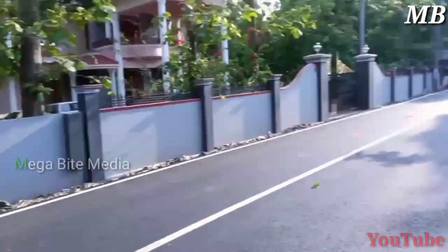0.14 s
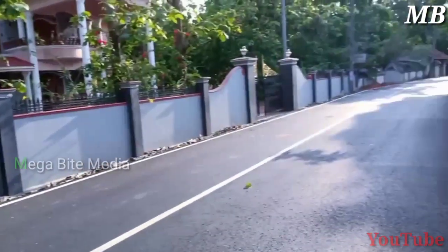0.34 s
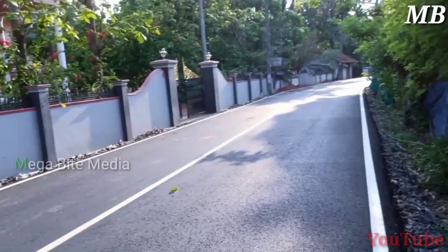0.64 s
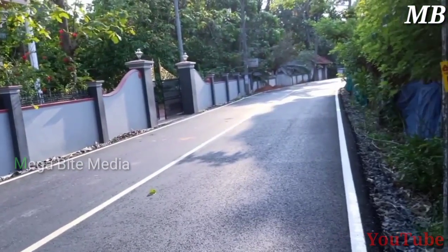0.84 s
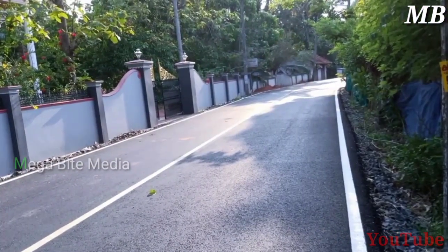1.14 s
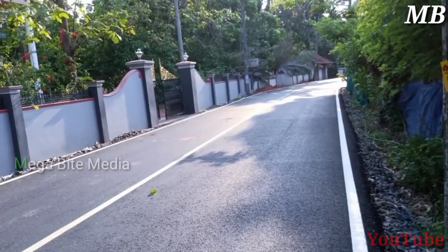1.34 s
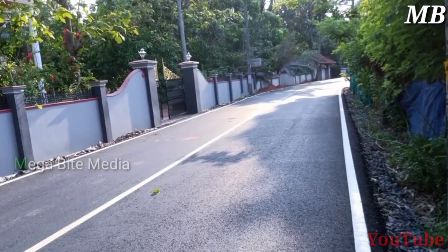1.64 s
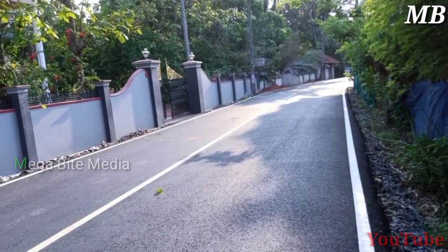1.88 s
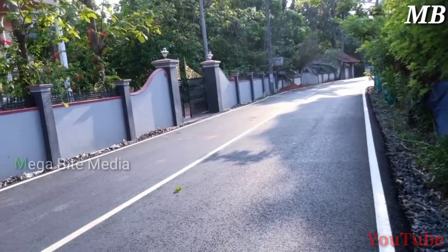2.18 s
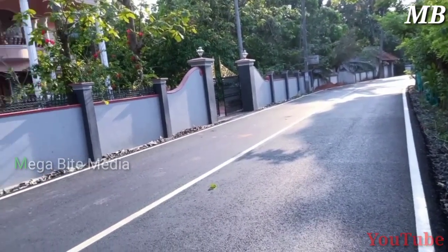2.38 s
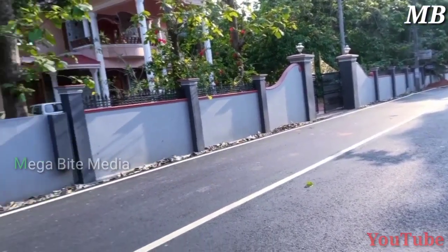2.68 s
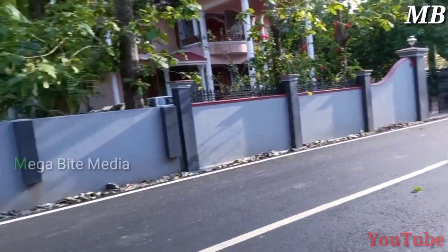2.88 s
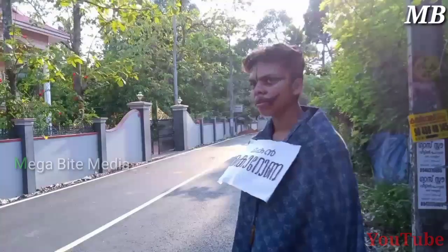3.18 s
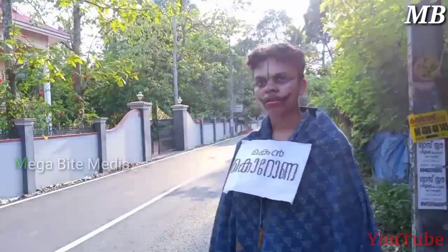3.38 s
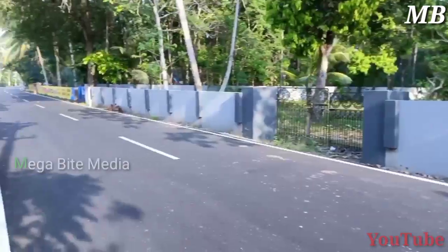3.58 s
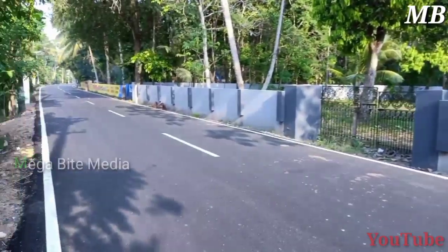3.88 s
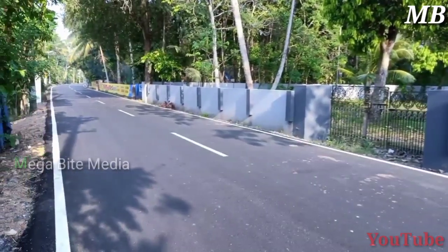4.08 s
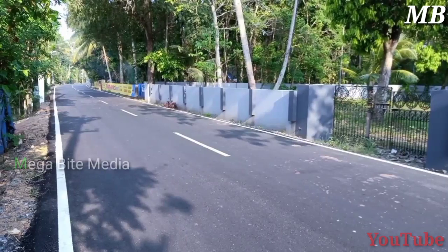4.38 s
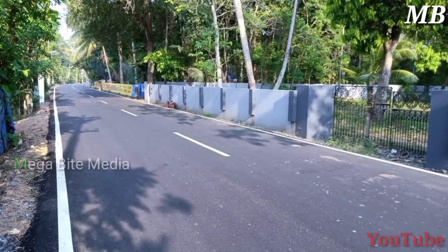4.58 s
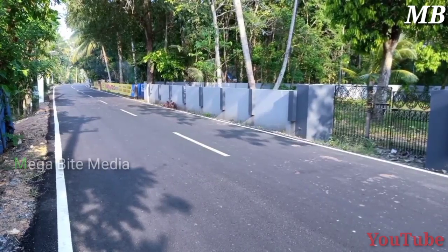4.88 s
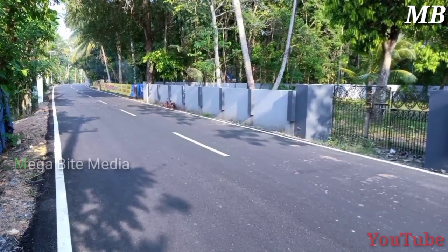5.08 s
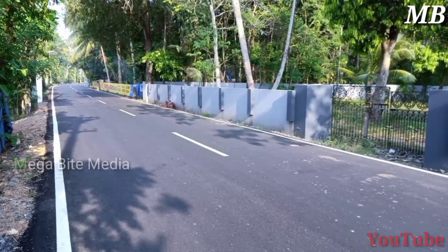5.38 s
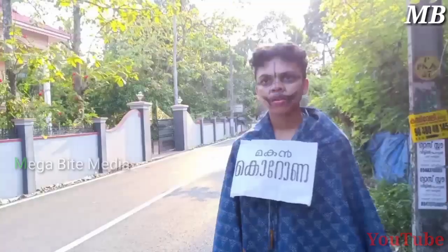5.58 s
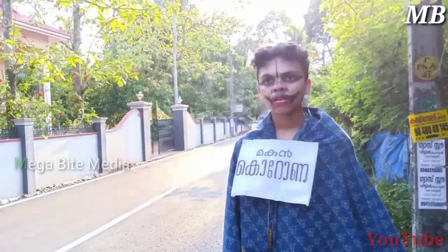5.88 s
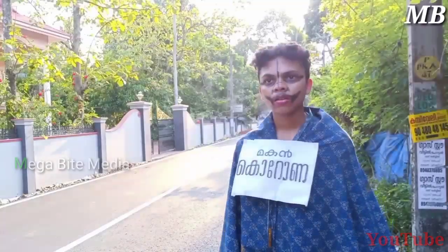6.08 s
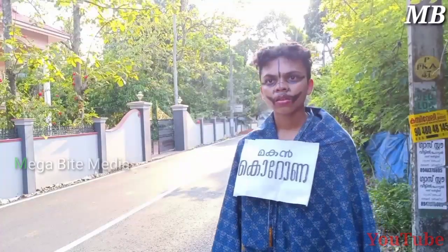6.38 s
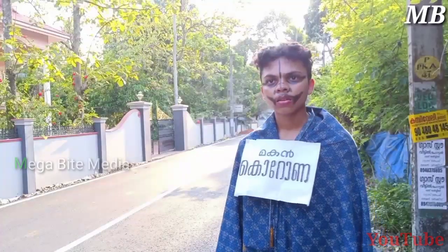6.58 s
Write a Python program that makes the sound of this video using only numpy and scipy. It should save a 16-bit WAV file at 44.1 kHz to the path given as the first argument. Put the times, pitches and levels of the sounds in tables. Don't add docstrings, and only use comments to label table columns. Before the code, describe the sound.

One cricket close to the microphones gives short, clear, pulsed chirps of five or eight rapid strokes, a little over two per second. Others of its kind answer softly almost in time, while a slightly lower group swells further off on the right. Underneath lie quiet outdoor air, a faint distant motor hum that grows, and low wind rumble, strongest at the start on the right. The insects fade at the end.

```python
import sys
import numpy as np
from scipy import signal
from scipy.fft import rfft, irfft, next_fast_len
from scipy.io import wavfile
from scipy.ndimage import uniform_filter1d

SR = 44100
rng = np.random.default_rng(int(sys.argv[2]) if len(sys.argv) > 2 else 0)


def store_pcm(level_fs):
    pcm = np.round(np.clip(level_fs, -1, 1) * 32767).astype(np.int16)
    wavfile.write(sys.argv[1], SR, np.atleast_2d(pcm).T)


def to_linear_factor(level_db):
    exponent = np.asarray(level_db, float) / 20
    return 10 ** exponent


N = 297087
TIME = np.arange(N) / SR


def near_cricket():
    # (multiple [1], level over the overtone level [dB], left minus right [dB])
    overtones = [
        (2, -2.5, -3.5),
        (3, -10, -9.5),
        (4, -22.5, 1.5),
    ]
    wing_hz, glide_hz, stroke_s = 2362, 165, .0215
    lag_s = 1.71e-4
    side = np.array([[.5], [-.5]])
    half = SR // 50
    t = np.arange(-half, half) / SR
    out, effort = np.zeros((2, N)), np.zeros(N)
    strokes = wing_strokes()
    chance = rng.standard_normal((len(strokes), 3))
    slip = np.tile(.3 * walk(700), 2)
    for (s, db, pan_db, over_db), (turn, pitch, span) in zip(strokes, chance):
        start = int(s * SR) - half
        length = stroke_s * (1 + 0.16 * span)
        swell, phase = stroke(t - lag_s * side, length, wing_hz + 18 * pitch, glide_hz)
        phase = phase + 9 * turn + slip[start:start + len(t)]
        x = to_linear_factor(db - 0.58 + pan_db * side) * swell * np.sin(phase)
        for k, rel_db, lean_db in overtones:
            level = to_linear_factor(over_db + rel_db + lean_db * side)
            x = x + level * swell ** (.45 * k) * np.sin(k * phase)
        add(out, start, x)
        add(effort, start, to_linear_factor(over_db) * swell[0] ** .4)
    flutter_db = 3 * np.tanh([walk(220), walk(220)])
    out *= to_linear_factor(flutter_db)
    noise = rng.standard_normal((3, 2, N))
    scrape = to_linear_factor(-14.5) * unit(band(noise[0], 4720, 2200, order=4))
    scrape += to_linear_factor(-16.5) * unit(band(noise[1], 7800, 9800))
    scrape += to_linear_factor(np.array([[-22], [-32]])) * unit(band(noise[2], 6800, 120))
    out += scrape * uniform_filter1d(effort, size=900)
    return out + to_linear_factor(-11.5) * foliage(out, t60=.17)


def wing_strokes():
    # (first stroke [s], peak [dB], swell [dB per stroke], left minus right [dB], overtones [dB])
    chirps = [(.173, -10.5, 1.5, -2, -38), (.577, -10.5, 0.5, -1, -38), (1.069, -11, -1, -2, -38),
              (1.465, -10.5, 0.5, -1, -37.5), (1.857, -11, 0, -2, -38), (2.330, -10, .5, 0, -37.5),
              (2.730, -12, .5, -0.5, -38.5), (3.207, -13, -0.5, -2.5, -38), (3.613, -11, 0, 0, -36.5),
              (4.042, -12, -0.03, -3.5, -38), (4.519, -12.5, 0.25, -3.5, -38),
              (4.977, -14.5, 0.5, -3.5, -39.5), (5.401, -12.5, 0, -3, -39.5), (5.885, -10, 1, 0, -37),
              (6.319, -10, 1.5, 0.5, -36.5), (6.729, -14.5, -2.5, -3.5, -37)]
    stroke_counts = [5, 8, 5, 5, 8, 5, 8, 5, 5, 8, 8, 5, 8, 5, 5, 1]
    gap_s, wobble_s = .0231, 0.0011
    first_catch_s, second_catch_s = .0042, .0062
    rows = []
    for (s, db, swell_db, pan_db, over_db), count in zip(chirps, stroke_counts):
        k = np.arange(count)
        late, louder, aside, brighter = rng.standard_normal((8, 4))[:count].T
        catch = first_catch_s * (k >= 2) + second_catch_s * (k >= 5)
        middle = s + gap_s * k + catch + wobble_s * late * (k > 0)
        peak_db = db + swell_db * (k - count / 2) - 2 * (k == 0) + 1.6 * np.tanh(louder)
        lean_db = pan_db + 4 * np.tanh(aside)
        bright_db = over_db - 3.5 * (k == 0) + brighter
        rows += zip(middle, peak_db, lean_db, bright_db)
    return rows


def stroke(t, length, hz, glide_hz, peaked=.95, bend=.4):
    u = np.clip(t / length, -.5, .5)
    swell = np.cos(np.pi * u) ** np.maximum(peaked, .2)
    phase = 2 * np.pi * (hz * t - glide_hz * length * (u ** 2 / 2 - bend * u ** 3))
    return swell, phase


def neighbours():
    # (start [s], length [s], level [dB])
    answers = [(.13, 0.23, -30), (.56, 0.21, -31.5), (.97, 0.21, -31.5), (1.45, 0.15, -30),
               (1.82, 0.21, -31), (2.28, 0.22, -30.5), (2.74, 0.18, -32.5), (3.14, 0.24, -30.5),
               (3.66, 0.13, -28), (4.02, 0.26, -33), (4.53, 0.21, -30), (4.94, 0.24, -32.5),
               (5.38, 0.28, -36), (5.85, 0.23, -33.5), (6.29, 0.25, -29.5)]
    kin = chorus(2330, 85, 160, rate=51, wet=0.36, count=5)
    kin += to_linear_factor(-36.5) * chorus(5000, 70, 250, rate=70, wet=0.33, count=2)
    kin += to_linear_factor(-33) * chorus(4720, 90, 260, rate=52, wet=0.76, count=2)
    level_db = swells(answers, rise_db_s=151, fall_db_s=138.5, rest_db=-56)
    return kin * to_linear_factor(level_db + np.array([[1.8], [3.5]]))


def lower_species():
    # (start [s], length [s], level [dB])
    low_song = [
        (.03, .18, -39),
        (.7, 0.24, -36.5),
        (1.5, 0.22, -36.5),
        (2.3, 0.21, -38.5),
        (3.04, 0.31, -38.5),
        (3.86, 0.32, -38),
        (4.63, 0.33, -40),
        (5.46, 0.22, -37.5),
        (6.22, 0.33, -36.5),
    ]
    low = chorus(2055, 30, 138, rate=36, wet=0.46, count=4)
    level_db = swells(low_song, rise_db_s=95, fall_db_s=82, rest_db=-67.5)
    return low * to_linear_factor(level_db + np.array([[1.5], [5]]))


def chorus(hz, spread_hz, glide_hz, rate, wet, count):
    out = np.zeros((2, N))
    for pitch, pace, lag, size in rng.standard_normal((count, 4)):
        beat = np.cumsum(rate * (1 + .04 * pace + 0.098 * walk(8))) / SR
        within = beat % 1 - .5
        swell = np.cos(np.pi * np.clip(1.7 * within, -.5, .5)) ** 0.35
        phase = 2 * np.pi * np.cumsum(hz + spread_hz * np.tanh(pitch) - glide_hz * within) / SR
        phase += 9 * rng.standard_normal(N // 500)[beat.astype(int)]
        song = to_linear_factor(1.5 * size + 4.15 * walk(8)) * swell * np.sin(phase)
        out += np.array([np.roll(song, int(9 + 3 * lag)), song])
    wet = np.clip(wet, 0, 1)
    return unit((1 - wet) * out + wet * foliage(out, t60=0.33))


def far_calls():
    # (start [s], length [s], start pitch [Hz], end pitch [Hz], peak [dB])
    calls = [
        (5.149, 0.117, 647, 806, -51.5),
        (5.489, 0.063, 562, 556, -53.5),
    ]
    out = np.zeros(N)
    for s, length, from_hz, to_hz, db in calls:
        count = int(length * SR)
        phase = 2 * np.pi * np.cumsum(np.linspace(from_hz, to_hz, count)) / SR
        add(out, int(s * SR), to_linear_factor(db) * np.hanning(count) * np.sin(phase))
    return out


def hum():
    # (time [s], level [dB])
    motor = [
        (0, -50),
        (1.2, -49),
        (2.2, -59),
        (2.8, -49.5),
        (3.9, -42.5),
        (6.1, -40),
        (6.74, -43),
    ]
    level_db = np.interp(TIME, *np.transpose(motor))
    pitch_hz = 108.4 + .4 * walk(3.064)
    phase = 2 * np.pi * np.cumsum(pitch_hz) / SR + np.array([[0], [.16]])
    far = np.clip((-45 - level_db) / 10, 0, 1)
    return np.sqrt(2) * to_linear_factor(level_db + (.5 + 6 * far) * walk(9)) * np.sin(phase)


def gusts():
    # (time [s], peak [dB])
    puffs = [(0, -29.5), (.62, -30.5), (1.2, -43), (1.74, -40.5), (1.99, -40), (3.15, -50), (3.43, -39),
             (4.03, -42), (4.57, -40.5), (5.21, -49), (5.4, -44), (5.83, -46), (5.98, -54), (6.34, -44),
             (6.68, -47)]
    wobble = unit(band(rng.standard_normal((2, N)), 56.7, 25))
    breeze_db = -51.5 + 4 * walk(10)
    rows = [(s, 0, db) for s, db in puffs]
    push_db = swells(rows, rise_db_s=179.5, fall_db_s=181, rest_db=breeze_db)
    return wobble * to_linear_factor(push_db + np.array([[-7], [5]]))


def night_air():
    # (frequency [Hz], level [dB])
    air_colour = [(20, 16), (45, 17.5), (100, 16), (200, 7.5), (500, -0.5), (1300, -12.5), (1750, -1),
                  (2300, 16.5), (2900, 6), (3100, -5.5), (3500, -18.5), (3700, -15.5), (8000, -20),
                  (15000, -27)]
    # (frequency [Hz], correlation [1])
    likeness = [(30, 0), (130, 1), (300, 0.28), (700, 0.51), (1500, 0), (15000, 0.19)]
    size = next_fast_len(N)
    octave = np.log2(np.arange(1, size // 2 + 2) * SR / size)
    colour, alike = np.transpose(air_colour), np.transpose(likeness)
    c = np.clip(np.interp(octave, np.log2(alike[0]), alike[1]), 0, 1)
    tint = to_linear_factor(np.interp(octave, np.log2(colour[0]), colour[1]))
    mid, side = rfft(rng.standard_normal((2, size))) * tint
    pair = np.sqrt(1 + c) * mid + np.sqrt(1 - c) * side * np.array([[1], [-1]])
    out, swell = 0, walk(1.0)
    for centre in np.arange(4, 14.5, .5):
        share = np.cos(np.pi * np.clip(octave - centre, -.5, .5)) ** 2
        out = out + to_linear_factor(.5 * swell + 1.5 * walk(7)) * irfft(pair * share, size)[:, :N]
    level_db = -55.5 + 0.54 * fade_db() + np.array([[1.2], [1.8]])
    return out / np.std(band(out, 790, 755)) * to_linear_factor(level_db)


def foliage(x, t60):
    t = np.arange(SR // 2) / SR
    echoes = rng.standard_normal((2, len(t))) * np.exp(-np.log(1000) * t / t60)
    echoes /= np.sqrt(np.sum(echoes ** 2, axis=1, keepdims=True))
    return signal.fftconvolve(x, echoes, axes=1)[:, :N]


def swells(rows, rise_db_s, fall_db_s, rest_db):
    power = to_linear_factor(2 * rest_db)
    for s, length, db in rows:
        rise_db = rise_db_s * np.maximum(s - TIME, 0)
        fall_db = fall_db_s * np.maximum(TIME - s - length, 0)
        power = power + to_linear_factor(2 * (db - rise_db - fall_db))
    return 10 * np.log10(power)


def fade_db():
    return -6 * np.maximum(TIME - 5.75, 0)


def walk(rate):
    k = int(SR / rate)
    held = np.repeat(rng.standard_normal(N // k + 1), k)
    return uniform_filter1d(uniform_filter1d(held, k), k)[:N]


def band(x, hz, width_hz, order=2):
    edges = [max(hz - width_hz / 2, 5), min(hz + width_hz / 2, .45 * SR)]
    return signal.sosfilt(signal.butter(order, edges, "bandpass", fs=SR, output="sos"), x)


def unit(x):
    return x / np.sqrt(np.mean(x ** 2))


def add(out, start, x):
    a, b = max(start, 0), min(start + x.shape[-1], N)
    out[..., a:b] += x[..., a - start:b - start]


def scene():
    insects = near_cricket() + neighbours() + lower_species()
    return insects * to_linear_factor(fade_db()) + night_air() + hum() + gusts() + far_calls()


def masked(x, slope_db, margin_db):
    window = np.sin(np.pi * (np.arange(2048) + .5) / 2048)
    frames = signal.stft(x, window=window, nperseg=2048, noverlap=1024)[2]
    strips = (np.abs(frames[:, :1024]) ** 2).reshape(2, 128, 8, -1).mean(axis=(0, 2))
    hz = (np.arange(128) + .5) * SR / 256
    above = np.log2(hz[:, None] / hz)
    guard_db = np.interp(hz, [2500, 2650, 2900, 3000, 3750, 4200], [40, 6, 5, -1, -3, 2.5])[:, None]
    reach = np.where(above > 0, to_linear_factor(-2 * (margin_db + guard_db + slope_db * above)), 0)
    waver = uniform_filter1d(rng.standard_normal(strips[::2].shape), size=4) * 2
    waver = np.repeat(waver, 2, axis=0)
    hidden = (strips < to_linear_factor(3 * waver) * (reach @ strips)) & (hz > 2500)[:, None]
    total = strips.sum(axis=0)
    loudness_db = 10 * np.log10(total / np.median(total))
    limit = np.interp(hz, [5000, 8000, 12000, 15000], [3.5, 2.2, 1.4, .4])[:, None]
    hidden |= waver > limit - .05 * loudness_db
    frames[:, :1024] *= np.repeat(~hidden, 8, axis=0)
    return signal.istft(frames, window=window, nperseg=2048, noverlap=1024)[1][:, :N]


def low_pass(x):
    return signal.sosfilt(signal.butter(12, 15020, fs=SR, output="sos"), x)


def record(dry):
    bent = dry + np.array([[.08], [.15]]) * band(dry ** 2, 35, 30)
    top = signal.ellip(10, .2, 80, 14950, fs=SR, output="sos")
    bent = signal.sosfilt(top, bent)
    last_fade = np.clip((TIME[-1] - TIME) / .003, 0, 1)
    mix = masked(bent, slope_db=70, margin_db=7.5) * last_fade
    return low_pass(mix)


dry = scene()
out = record(dry)
store_pcm(out)
```